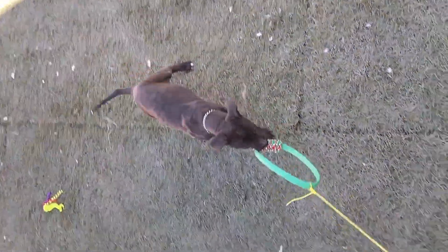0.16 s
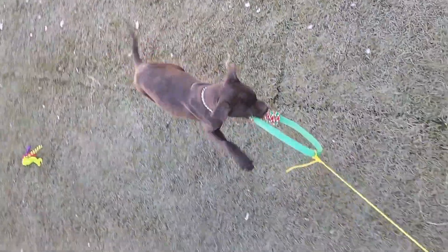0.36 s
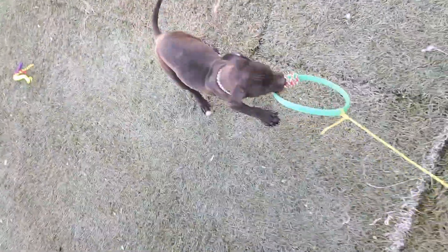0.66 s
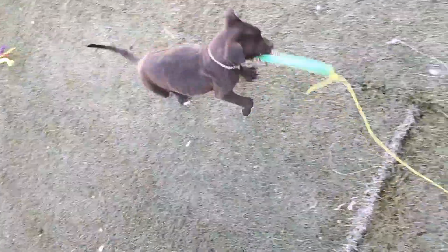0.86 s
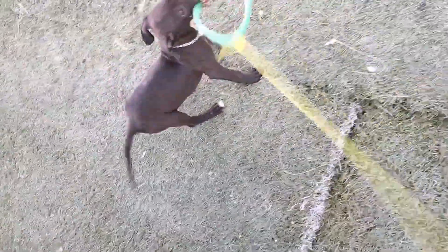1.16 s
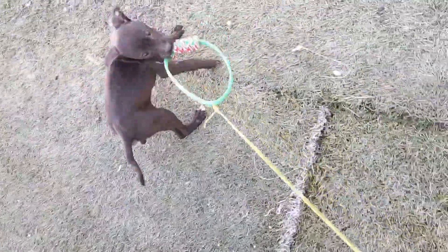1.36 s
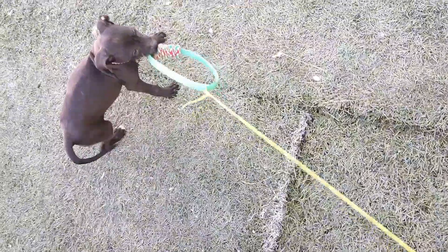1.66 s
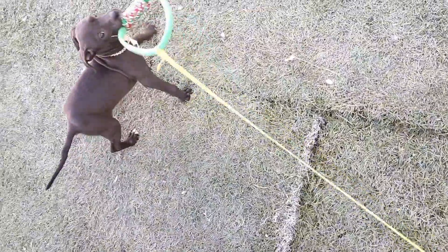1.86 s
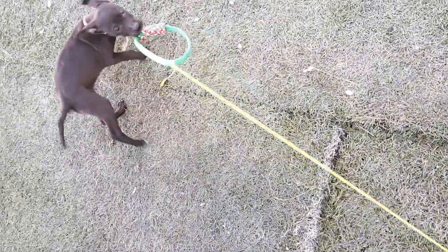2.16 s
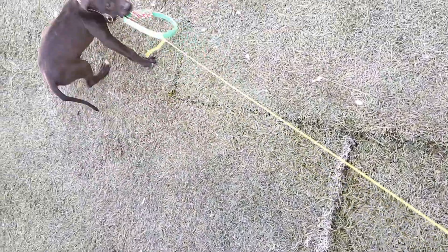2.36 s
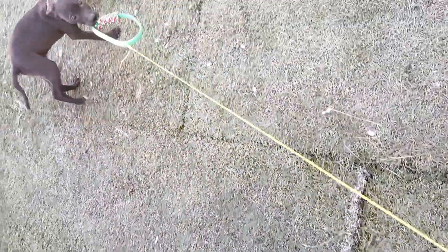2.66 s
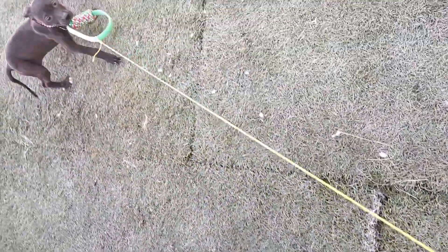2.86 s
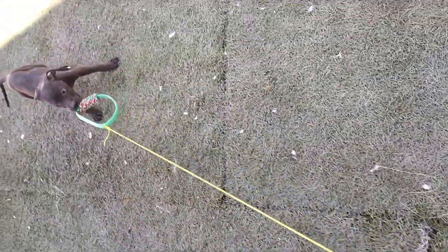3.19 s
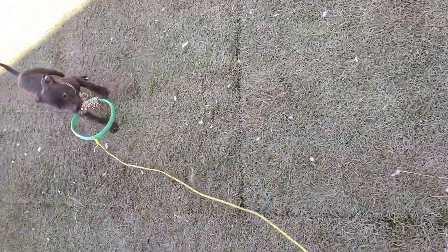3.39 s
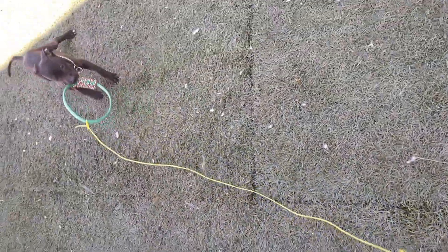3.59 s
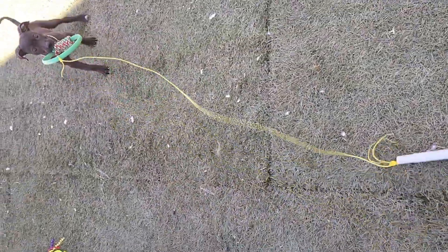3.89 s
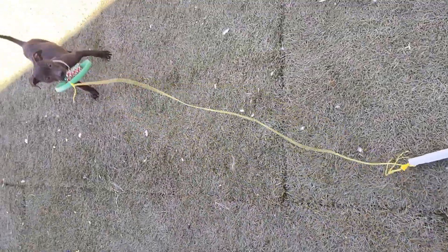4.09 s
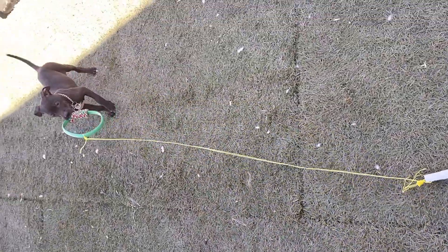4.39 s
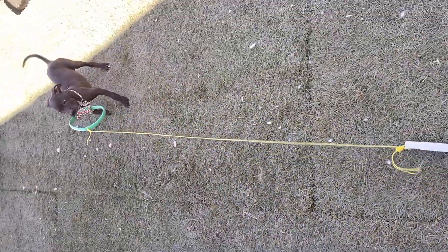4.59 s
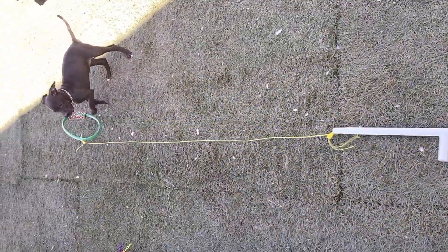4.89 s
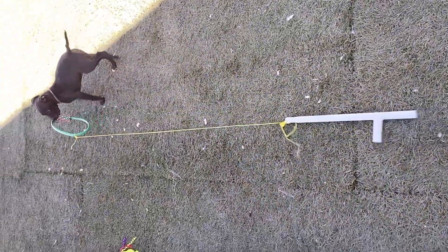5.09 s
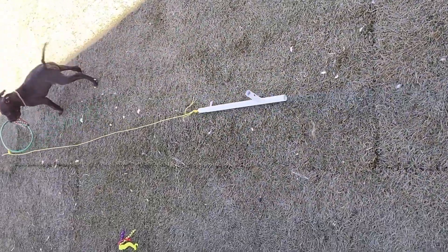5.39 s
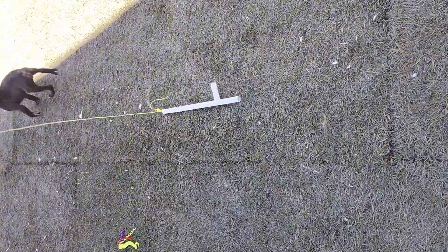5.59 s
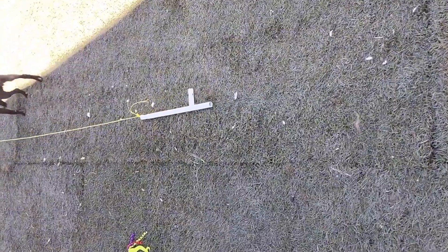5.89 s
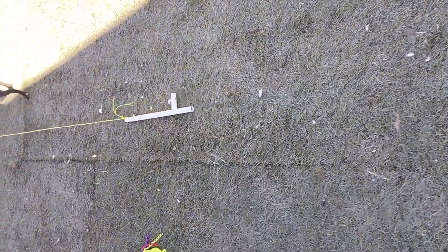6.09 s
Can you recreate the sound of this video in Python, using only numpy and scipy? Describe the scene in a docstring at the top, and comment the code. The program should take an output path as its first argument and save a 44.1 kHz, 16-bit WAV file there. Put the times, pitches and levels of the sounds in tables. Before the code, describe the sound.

An engine rumbles and grows louder while a puppy scuffs over turf and a light metal pole clatters down and is dragged.

```python
"""A puppy drags a pole in a yard

Beyond the yard an engine rumbles and pulls away, growing louder among the drones of other traffic.
Close by, a puppy scuffs over artificial turf, its collar tinkling, and tugs at a rope tied to a light
metal pole. The pole drops, clatters and is dragged off, ringing faintly at its own natural pitches."""
import sys
import numpy as np
from scipy import signal
from scipy.fft import rfft, irfft, next_fast_len
from scipy.io import wavfile
from scipy.ndimage import map_coordinates

SR = 44100
rng = np.random.default_rng(int(sys.argv[2]) if len(sys.argv) > 2 else 0)


def generate_wav(signal):
    """Clip the signal to [-1, 1] and save it as 16-bit WAV at the path in sys.argv[1]."""
    frames = np.transpose(np.atleast_2d(signal))
    scaled = np.clip(frames, -1, 1) * 32767
    pcm = np.round(scaled).astype(np.int16)
    wavfile.write(sys.argv[1], SR, pcm)


N = 275623

# how often the main engine repeats its cycle of firings: t/s, f/Hz
ENGINE_CYCLE = [(0, 17.5), (1.3, 17.8), (2, 17.4), (2.8, 17.6), (3.3, 18), (3.65, 18.1), (3.9, 19.4),
                (4.2, 20.05), (4.5, 21.7), (5, 23.8), (5.3, 25.1), (5.6, 25.95), (5.85, 27.6), (6.05, 29.1),
                (6.25, 30.15)]
# how strongly its exhaust booms: t/s, relative level/dB
EXHAUST_LEVEL = [(0, -49), (1.1, -46), (1.4, -42), (2.35, -36), (3.1, -44), (3.9, -35.5), (5.1, -40),
                 (5.65, -28), (6.17, -29.5), (6.25, -38)]
# the pole's modes, the pitches at which it naturally rings: f/Hz
POLE_MODE_HZ = [1943, 3278, 3348, 3530, 3866, 4129, 4585, 4950, 5702, 5850, 5937, 6128, 6372, 6952, 7305,
                7589, 7835, 7904, 8304, 9183, 9580, 10238, 10411, 11180, 11960, 12290, 12580, 13100, 13660,
                14510]
# the same modes: level when struck/dB, level when dragged/dB, ring time before extra damping/s
POLE_MODES = [(-2, 8, 0.48), (-2, -10, 0.67), (-8, -10, 0.79), (4.5, -23, 0.18), (-2.5, -1.5, 0.39),
              (-5.5, -7, 0.54), (4.5, -8, 0.13), (-2, -9, 0.13), (3, -1, 0.14), (-13, 3.5, 0.3),
              (0, -6, 0.18), (-4, 1, 0.33), (-10, -4, 0.25), (-8, -10, 0.19), (-21, -10.5, 0.23),
              (-6, 0.5, 0.31), (-1, -4, 0.26), (-19, -18, 0.25), (-2, -30.5, 0.15), (6, -4, 0.17),
              (0.5, -5.5, 0.36), (-1, -5.5, 0.23), (5.5, -6, 0.14), (0, -3, 0.23), (-11, -17, 0.22),
              (-3, -23.5, 0.13), (-5, -7, 0.2), (-9, -6.5, .18), (3, -15.5, .18), (-11, -3.5, .18)]


def amp(db):
    """Turn decibels into a gain."""
    return 10 ** (np.asarray(db) / 20)


def unit(x):
    """Scale a signal to an average strength (rms) of 1."""
    return x / np.sqrt(np.mean(x ** 2) + 1e-20)


def along(points, hz):
    """Read between rows of f/Hz, value on a logarithmic pitch scale."""
    f, v = np.transpose(points)
    return np.interp(np.log(hz + 1), np.log(f + 1), v)


def curves(rows):
    """Join timed rows with straight lines: one curve for each column after the time."""
    s, *cols = np.transpose(rows)
    return [np.interp(np.arange(N) / SR, s, c) for c in cols]


def wobble(rate):
    """A smooth random curve through `rate` new values a second."""
    return map_coordinates(rng.standard_normal(4096), [np.arange(N) * rate / SR], mode="wrap")


def filtered(x, response):
    """Give each frequency in x the gain that response(hz) asks for."""
    size = next_fast_len(N + SR // 2)
    return irfft(rfft(x, size) * response(np.fft.rfftfreq(size, 1 / SR)), size)[..., :N]


def pan(lean_db):
    """Left and right gains; a positive lean makes the left louder."""
    gains = amp(np.array([[.5], [-.5]]) * lean_db)
    return gains / np.sqrt(np.mean(gains ** 2, axis=0))


def rush(spectrum):
    """Stereo noise shaped by rows of f/Hz, level/dB; the sides match in the bass but not the treble."""
    # how alike left and right are: f/Hz, likeness (1 = the same)
    likeness = [(60, 0.99), (110, 0.88), (200, 0.85), (380, 0.63), (700, 0.37), (1290, -0.028),
                (2400, 0.04), (15000, -0.11)]

    def response(hz):
        angle = np.arccos(np.clip(along(likeness, hz), -1, 1)) / 2
        return amp(along(spectrum, hz)) * np.array([np.cos(angle), np.sin(angle)])
    mid, side = filtered(rng.standard_normal((2, N)), response)
    return unit(np.array([mid + side, mid - side]))


def tone(hz):
    """A pure tone that follows a pitch curve."""
    return np.sqrt(2) * np.sin(2 * np.pi * (np.cumsum(hz) / SR + rng.random()))


def ring(hz, t60, spread_db):
    """One struck mode fading 60 dB in t60 seconds, with its own strength and phase on each side."""
    t = np.arange(SR // 2) / SR
    phase = rng.uniform(0, 2 * np.pi, (2, 1))
    return amp(rng.normal(0, spread_db, (2, 1)) - 60 * t / t60) * np.sin(2 * np.pi * hz * t + phase)


def bursts(times, levels_db, attack, t60):
    """The loudness curve of blows that rise quickly and die away."""
    t = np.arange(SR) / SR
    shape = (1 - np.exp(-t / attack)) * amp(-60 * t / t60)
    out = np.zeros(N + SR)
    for s, db in zip(times, levels_db):
        out[round(s * SR):][:SR] += amp(db) * shape
    return out[:N]


def strokes(rows):
    """The loudness curve of rubs: each grows tenfold over its rise and fades as much over its fall."""
    t = np.arange(N) / SR
    return sum(amp(db) * 10 ** -np.maximum((s - t) / rise, (t - s) / fall) for s, db, rise, fall in rows)


def gate(start, end, fade):
    """A gain of 1 between two times, with soft edges."""
    t = np.arange(N) / SR
    return np.clip((t - start) / fade + .5, 0, 1) * np.clip((end - t) / fade + .5, 0, 1)


def add(track, s, sound):
    """Mix a sound into a track at s seconds."""
    part = track[:, round(s * SR):][:, :sound.shape[1]]
    part += sound[:, :part.shape[1]]


def yard(x, wet_db, t60):
    """Walls around the yard add a short, dense echo, different on each side."""
    t = np.arange(SR // 2) / SR
    tail = rng.standard_normal((2, len(t))) * amp(-60 * t / t60) * (t > .004)
    tail /= np.linalg.norm(tail[0])
    return x + amp(wet_db) * signal.fftconvolve(x, tail, axes=1)[:, :N]


def drone(hz, db, octave_db):
    """A distant engine: the tone of its firings and the octave above."""
    return amp(db) * (tone(hz) + amp(octave_db) * tone(2 * hz))


def other_engines(idle_hz=65.76, fade=.06):
    """One engine revs and eases, one idles, others rev briefly."""
    # the engine that revs and eases: t/s, f/Hz, relative level/dB
    revving = [(1.5, 122.9, -46), (1.654, 125.5, -34.5), (1.992, 135.4, -41.5), (2.15, 139.3, -33.5),
               (2.368, 131.9, -36), (2.994, 128.1, -41), (3.0, 130, -53.5)]
    # the idling engine: t/s, relative level/dB
    idling = [(0, -31), (.25, -32.5), (.7, -44.5), (1, -34), (1.2, -42), (2.099, -37.5), (2.6, -49),
              (3.1, -52)]
    # brief revs: t/s, length/s, start f/Hz, end f/Hz, level/dB
    brief_revs = [(0.484, 0.68, 156.4, 162.9, -42.5), (0.961, .08, 102, 105.4, -34),
                  (1.121, .1, 116.2, 117, -33), (3.713, .16, 139.7, 151.7, -35.5)]
    rev_hz, rev_db = curves(revving)
    idle_db, = curves(idling)
    rev = drone(rev_hz, rev_db + .5, octave_db=-21) * gate(revving[0][0], revving[-1][0], fade)
    idle = drone(idle_hz + 0.47 * wobble(5), idle_db - .5, octave_db=-21.5)
    out = rev + idle * gate(idling[0][0], idling[-1][0], fade)
    for s, length, start_hz, end_hz, db in brief_revs:
        glide_hz, = curves([(s, start_hz), (s + length, end_hz)])
        out += amp(db) * tone(glide_hz) * gate(s, s + length, fade=0.13)
    return out


def traffic():
    """Engines drone over the road's roar and tyre hiss; a rumble grows as the main engine speeds up."""
    # the deep rumble: f/Hz, relative level/dB
    rumble_spectrum = [(18, -30), (25, -6.5), (32, 5.5), (42, 12), (75, 8), (120, 10), (160, 6),
                       (190, -0.5), (230, -3), (300, -31.5), (450, -59.5)]
    # the road's roar: f/Hz, relative level/dB
    roar_spectrum = [(120, -6), (240, 2.5), (340, -5.5), (430, -1.5), (520, -6), (680, -1.5), (1000, -4.5),
                     (1400, -7), (2000, -16), (3000, -36.5), (5000, -59)]
    # how the roar sinks and swells: t/s, level/dB
    roar_level = [(0, -46.5), (1.2, -47), (3.3, -49), (6.25, -44)]
    # the tyre hiss: f/Hz, relative level/dB
    tyre_spectrum = [(700, -26.5), (1500, 0.5), (2000, 1.5), (2600, -1), (3300, -11), (4500, -18.5),
                     (7000, -25.5), (10000, -42.5), (15500, -44)]
    # how the hiss sinks and swells: t/s, relative level/dB
    tyre_level = [(0.0, -66), (0.5, -64), (2.03, -69), (4.33, -70), (6.11, -57), (6.25, -51.5)]
    # which side the traffic is louder on: f/Hz, left minus right/dB
    lean = [(60, -2.5), (110, 0), (200, -2.5), (380, 2.5), (700, -2), (1290, -1.5), (2380, -.5), (8000, 5),
            (15000, -2.5)]
    exhaust_db, = curves(EXHAUST_LEVEL)
    hiss_db, = curves(tyre_level)
    roar_db, = curves(roar_level)
    rumble_db = -41 + 5 * engine_speed() + 0.081 * (exhaust_db - exhaust_db.mean())
    rumble = amp(rumble_db) * rush(rumble_spectrum)
    roar = amp(roar_db + 0.66 * wobble(8)) * rush(roar_spectrum)
    hiss = amp(hiss_db + 1.5) * rush(tyre_spectrum)
    return filtered(other_engines() + rumble + roar + hiss, lambda hz: pan(along(lean, hz)))


def engine_speed():
    """The main engine's speed: 0 at idle, 1 at its fastest."""
    cycle_hz, = curves(ENGINE_CYCLE)
    return (cycle_hz - cycle_hz.min()) / np.ptp(cycle_hz)


def engine(roughness=0.0044, flutter_db=3, wander_hz=0.869, throttle_s=3.68, opening_s=0.2):
    """Uneven firings make tones at multiples of the cycle rate; the exhaust booms and puffs."""
    # the weaker tones: multiple of the cycle rate, relative level when slow/dB, when fast/dB
    weak_tones = [(2, -53.5, -55), (4, -58, -40.5), (6, -39, -42.5), (7, -44.5, -55.5), (8, -51, -46),
                  (11, -52.5, -54), (14, -66, -55), (16, -68, -51.5), (17, -70.5, -54.5),
                  (19, -66.5, -58.5), (22, -69, -67), (23, -71, -56)]
    # how hard the engine works: t/s, relative level/dB
    load = [(0, -16.5), (3.3, -7), (3.75, 3.5), (4.2, 2), (4.7, 5), (5.5, 4.5), (6.25, 1)]
    # exhaust resonances that the boom climbs through as the engine speeds up: f/Hz, gain/dB
    pipe = [(53, 2.5), (58, -10), (65, 3), (71, -0.5), (80, -1), (90, -1), (99, 3), (108, -6), (119, 3),
            (130, 1.5), (150, 1)]
    # the hiss of air being sucked in: f/Hz, relative level/dB
    intake_spectrum = [(1500, -5.5), (2800, 4), (4500, -3.5), (7500, -7.5), (9000, -19), (15000, -30)]
    # the growl of the exhaust puffs: f/Hz, relative level/dB
    puff_spectrum = [(150, -15), (240, -5.5), (330, 1), (450, -2.5), (560, 3), (680, -2.5), (1000, -5.5),
                     (2000, -35.5), (4000, -54.5)]
    steady_hz, = curves(ENGINE_CYCLE)
    exhaust_db, = curves(EXHAUST_LEVEL)
    load_db, = curves(load)
    speed = engine_speed()
    throttle = np.clip((np.arange(N) / SR - throttle_s) / opening_s, 0, 1)
    cycle_hz = steady_hz * (1 + roughness * wobble(20))

    def pipe_tone(multiple):
        return amp(exhaust_db + along(pipe, multiple * steady_hz)) * tone(multiple * cycle_hz)

    def weak_tone(multiple, body_hz=237.3, width_hz=5.1, body_db=5.5):
        """A fluttering tone, lifted as it passes a resonance; higher ones wander more in pitch."""
        lift_db = body_db / (1 + ((multiple * steady_hz - body_hz) / width_hz) ** 2)
        gain = amp(lift_db + flutter_db * wobble(13))
        return gain * tone(multiple * cycle_hz + wander_hz * (1 + multiple / 10) * wobble(22))
    # opening the throttle brings up the fifth multiple
    boom = pipe_tone(3) + amp(-10 * (1 - throttle)) * pipe_tone(5)
    hum = sum(amp(slow + (fast - slow) * speed + load_db - 4) * weak_tone(round(multiple))
              for multiple, slow, fast in weak_tones)
    puffs = unit(rush(puff_spectrum) * amp(2.5 * tone(3 * cycle_hz)))  # one puff at each firing
    intake = amp(-61.5 - 27.5 * (1 - speed)) * rush(intake_spectrum)
    return (boom + hum) * pan(-0.55) + intake + amp(-43 - 25.3 * (1 - speed)) * puffs


def paws(patter_s=(2.2, 3.5), patter_db=-81.5):
    """Paws flick the plastic blades of the turf in scuffs and steps, and thump the ground."""
    # paws and rope brushing the turf: peak t/s, level/dB, rise/s, fall/s
    scuffs = [(.122, -64.5, 0.0087, 0.028), (.37, -66.5, 0.12, .16), (.555, -56.5, 0.026, 0.09),
              (.68, -67, 0.066, .09), (.975, -57.5, 0.22, 0.12), (1.035, -54, 0.067, .07),
              (1.115, -65, 0.017, 0.27), (4.66, -60, 0.055, 0.19), (5.86, -61, 0.2, 0.22)]
    # the rustle of the blades: f/Hz, relative level/dB
    turf_spectrum = [(1500, 0.5), (2400, 7.5), (3000, -4), (4000, 2.5), (5200, -6.5), (7300, -5.5),
                     (9500, -7.5), (12000, -15), (15500, -15)]
    # paws landing: t/s, level/dB
    footfalls = [(1.16, -71), (1.63, -68), (1.967, -69.5), (2.112, -71), (2.145, -72.5), (2.212, -77.5),
                 (2.33, -77.5), (2.432, -71), (2.492, -71), (2.54, -76.5), (3.11, -75)]
    # the puppy's weight hitting the ground: peak t/s, level/dB, rise/s, fall/s
    thumps = [(1.08, -49, 0.0099, 0.056), (1.32, -52.5, 0.077, .4)]
    # the dull sound of a thump: f/Hz, relative level/dB
    thump_spectrum = [(150, -12.5), (340, 0.5), (620, 6), (1200, -17), (4000, -41.5), (8000, -78)]
    blades = unit(rush(turf_spectrum) * amp(1.6 * wobble(330)))
    steps = rush([(2500, -4.5), (4500, -14), (7300, 5), (8500, -7), (12000, -12.5), (15500, -13)])
    patter = [(s, patter_db) for s in rng.uniform(*patter_s, size=8)]  # lighter steps in between
    steps *= bursts(*np.transpose(footfalls + patter), attack=.005, t60=.2)
    return blades * strokes(scuffs) * pan(-7.5) + steps * pan(.5) + rush(thump_spectrum) * strokes(thumps)


def collar(ring_s=0.043, spread_hz=90, rebound_s=0.024, rebound_db=-11.5):
    """Small metal parts meet and rebound more softly, each tink at a slightly different pitch."""
    # the parts meeting: t/s, relative level/dB
    tinks = [(0.155, -63.5), (0.4524, -66), (0.5711, -68), (0.6624, -57), (0.9976, -64), (1.078, -62),
             (1.1085, -64), (1.1618, -60.5), (2.3208, -72), (2.6332, -71), (2.673, -68), (2.7107, -70),
             (2.7751, -80.5), (2.9682, -82), (3.0185, -75), (3.04, -66), (3.2217, -71), (3.5468, -66),
             (3.5857, -73)]
    # the pitches they ring at: f/Hz, relative level/dB
    modes = [(10830, 6), (11020, 2.5), (11260, -0.5)]
    track = np.zeros((2, N))
    rebounds = [(s + rebound_s * rng.uniform(.7, 1.3), db + rebound_db) for s, db in tinks]
    for s, db in list(tinks) + rebounds:
        tink = sum(amp(level) * ring(hz + rng.normal(0, spread_hz), ring_s, spread_db=4.5)
                   for hz, level in modes)
        # each tink swells in softly over a few milliseconds
        swell = (1 - np.exp(-np.arange(tink.shape[1]) / SR / .004)) ** 2
        add(track, s - .004, amp(db + 4) * tink * swell * pan(-3.5))
    return yard(track, wet_db=-10, t60=.3)


def beating_pair(hz, t60):
    """A tube that is not quite round splits each mode into two close pitches that beat."""
    return ring(hz, t60, spread_db=2) + .7 * ring(hz * (1 + rng.normal(0, .012)), t60 / 2, spread_db=3)


def pole_drop(accent_db=8, detune=0.0022, damping_hz=19000):
    """The pole lands end by end and bounces: a dull knock, a crack and the ring of the tube."""
    # each landing: t/s, relative ring/dB, crack/dB, knock/dB, left minus right/dB, favoured f/Hz, rise/s
    landings = [(3.692, -53, -36.5, -31.5, -2, 3540, 0.0013),
                (3.726, -50.5, -38.5, -36, -3.5, 6200, 0.0019), (3.741, -63, -46, -52.5, 5, 12300, .004),
                (3.821, -58, -51, -74, -3, 8350, 0.0046), (3.837, -50, -54.5, -75, 0, 5730, 0.0028),
                (3.876, -62, -55, -66, -4.5, 7800, .005), (3.971, -52, -43.5, -60.5, -5.5, 3524, 0.0067),
                (4.048, -59, -50, -72, -3, 9400, 0.0041), (4.16, -73, -76, -85, -18, 7900, 0.0066),
                (4.188, -70.5, -65.5, -83, -5, 9200, .006)]
    # the bright crack: f/Hz, relative level/dB
    crack_spectrum = [(1500, -7.5), (2800, -11), (3500, 9.5), (5000, -7), (6100, 12), (7000, -8.5),
                      (8500, -1), (10000, 3.5), (11700, -7), (13000, 0), (15500, -3.5)]
    # the dull knock: f/Hz, relative level/dB
    knock_spectrum = [(100, -22.5), (220, 3.5), (500, 1), (900, 0.5), (1800, -12.5), (3000, -16.5),
                      (6000, -32.5)]
    tube, snaps = np.zeros((2, N)), np.zeros((2, N))
    crack, knock = rush(crack_spectrum), rush(knock_spectrum)
    t = np.arange(SR // 2) / SR
    for s, ring_db, crack_db, knock_db, lean_db, accent_hz, rise in landings:
        ringing = np.zeros((2, len(t)))
        for hz, (db, _, t60) in zip(POLE_MODE_HZ, POLE_MODES):
            # the spot that hits the ground favours some modes
            lift_db = accent_db * np.exp(-(np.log(hz / accent_hz) / .05) ** 2)
            ring_s = t60 / (1 + (hz / damping_hz) ** 2)
            ringing += amp(db + lift_db) * beating_pair(hz * (1 + detune * rng.normal()), ring_s)
        add(tube, s, amp(ring_db - 8.5) * ringing * (1 - np.exp(-t / rise)) * pan(lean_db))
        # a sharp contact, then a brief buzz against the ground
        contact = bursts([s], [crack_db], attack=rise, t60=.016 + 6 * rise)
        buzz = bursts([s], [crack_db - 16], attack=.005, t60=.13)
        snaps += crack * (contact + buzz) * pan(lean_db)
        snaps += knock * bursts([s], [knock_db], attack=0.00024, t60=0.035)
    return yard(tube, wet_db=-8.5, t60=0.47) + yard(snaps, wet_db=-18.5, t60=0.27)


def pole_drag(damping=0.00076, stutter_db=2, stutters_per_s=21):
    """Turf blades flick the sliding tube and keep it ringing; it catches, slips and skips."""
    # tugs that slide the pole along: peak t/s, relative level/dB, rise/s, fall/s
    tugs = [(4.6, -72, .13, .6), (4.91, -62, 0.21, .14), (5.03, -59, 0.041, 0.21),
            (5.245, -54.5, 0.18, .12), (5.53, -69, .06, 0.22), (5.65, -72, .08, 0.27)]
    # the sliding pole skips: t/s, relative level/dB
    skips = [(4.66, -69.5), (4.76, -69), (4.862, -57.5), (4.899, -59), (5.015, -52.5), (5.046, -59.5),
             (5.19, -56), (5.225, -55), (5.25, -55), (5.52, -61), (5.63, -66.5)]
    # it grazes the ground before it slides: peak t/s, level/dB, rise/s, fall/s
    grazes = [(3.38, -70.5, 0.068, .05), (4.2, -78.5, .13, .15)]
    # a thin zing, probably the rope running: peak t/s, level/dB, rise/s, fall/s
    zings = [(4.2, -72, 0.39, 0.11), (4.65, -72.5, .25, 2.6)]
    # the zing rises in pitch: t/s, f/Hz
    zing_pitch = [(4.62, 9260), (5.1, 10170)]
    # the pole is pulled from the right to about the middle: t/s, left minus right/dB
    path = [(4.75, -12.5), (5.05, 4)]

    def tube_response(f):
        """One resonance peak for each mode; higher ones are wider."""
        widths_hz = 9 + damping * np.array(POLE_MODE_HZ)
        return sum(amp(db) / np.sqrt(width) / (1 + 2j * (f - hz) / width)
                   for hz, width, (_, db, _) in zip(POLE_MODE_HZ, widths_hz, POLE_MODES))
    lean_db, = curves(path)
    force = strokes(tugs) * amp(stutter_db * wobble(stutters_per_s))
    force += amp(-8) * bursts(*np.transpose(skips), attack=0.0035, t60=0.07)
    flicks = rng.standard_normal((2, N)) * amp(4 * wobble(200))
    grit = rush([(3000, -5), (5200, -13), (6000, 1.5), (6800, -9),
                 (7700, 3.5), (8500, -2.5), (9500, 8), (15500, 4)])
    grit = unit(grit * amp(3.5 * wobble(250)))
    scrape = unit(filtered(flicks, tube_response)) + amp(-7) * grit
    rasp = unit(np.array([wobble(650), wobble(650)]) * amp(3 * wobble(45)))
    zing = strokes(zings) * tone(*curves(zing_pitch)) * rasp
    return (amp(2.4) * force * scrape + strokes(grazes) * grit + zing) * pan(lean_db)


def scene():
    """The road beyond the yard and the game on the turf."""
    # the microphone's body shades its left side from the pole's treble: f/Hz, left minus right/dB
    shadow = [(1500, 1), (3500, -1), (5000, 1), (8000, -4), (15000, -13)]
    pole = filtered(pole_drop() + pole_drag(), lambda hz: pan(along(shadow, hz)))
    return engine() + traffic() + paws() + collar() + pole


def record(dry):
    """Cut away the very highest treble."""
    top_hz = 15780
    return filtered(dry, lambda hz: hz < top_hz)


dry = scene()
out = record(dry)
generate_wav(out)
```